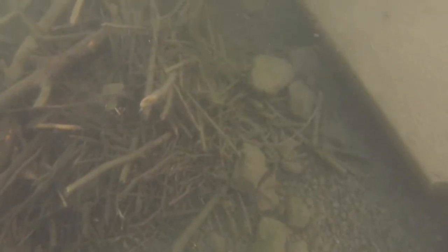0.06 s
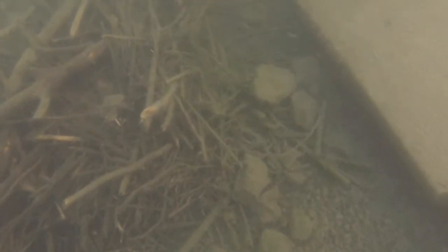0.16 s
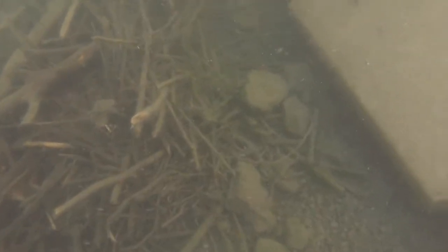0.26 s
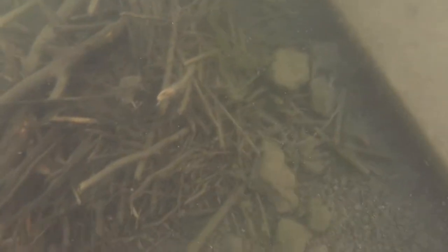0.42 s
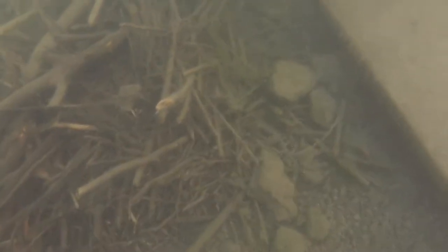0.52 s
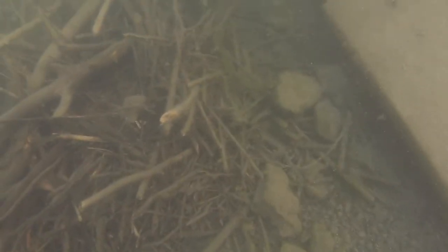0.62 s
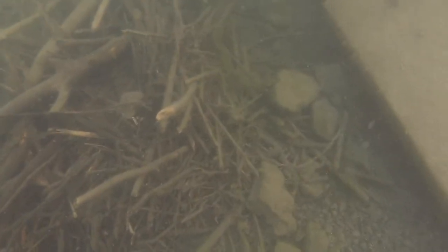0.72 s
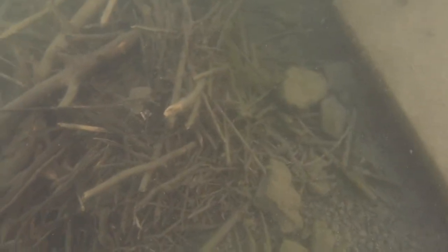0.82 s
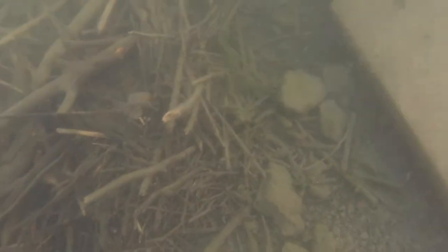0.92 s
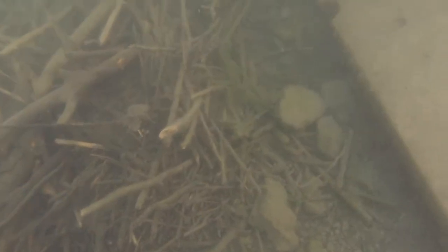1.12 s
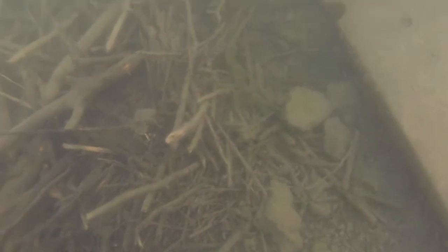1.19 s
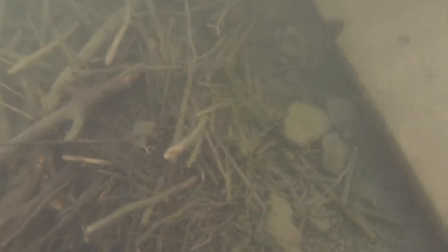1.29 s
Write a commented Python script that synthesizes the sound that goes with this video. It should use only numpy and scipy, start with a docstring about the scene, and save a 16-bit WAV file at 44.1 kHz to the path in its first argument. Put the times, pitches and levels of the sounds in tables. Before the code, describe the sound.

Water slaps and glugs against a small camera housing, loudest early, then sparse soft blips and patter

```python
"""Camera pushed through water

A small camera in a plastic housing is pushed through lake water. Each slap is a dull thud and a rough spatter
that make the housing ring briefly. Air pockets glug as short swelling tones that climb in pitch. Eddies and
droplets patter on the housing as many tiny hits, and tiny bubbles ping, most of all under washes of water.
Slow surges rumble at the microphone as low noise of changing level, over a faint steady hiss."""
import sys
import numpy as np
from scipy import signal
from scipy.fft import rfft, irfft, next_fast_len
from scipy.io import wavfile
from scipy.ndimage import map_coordinates

SR = 44100
rng = np.random.default_rng(int(sys.argv[2]) if len(sys.argv) > 2 else 0)


def rack_gain(trim_db):
    """Turn a fader trim in dB into the linear factor to multiply a signal by."""
    fader = np.asarray(trim_db, float)
    return 10 ** (fader / 20)


def store_pcm(level_fs):
    """Save levels as 16-bit WAV."""
    pcm = np.round(np.clip(level_fs, -1, 1) * 32767).astype(np.int16)
    wavfile.write(sys.argv[1], SR, np.atleast_2d(pcm).T)


N = 59535  # samples, 1.35 s

# Water slapping the housing: start t/s, thud peak level/dB, spatter peak over the thud level/dB
SLAP_EVENTS = [(.083, -35, -6), (0.214, -9, -28), (0.2278, -11, -38.5), (0.289, -31.5, -3),
               (.349, -21.5, 6.5), (.382, -26.5, -7.5), (0.395, -11.5, 2.5), (.3995, -4.5, -4),
               (0.4051, -10, -3), (0.4106, -2, -15.5), (0.432, -35, 4.5), (0.595, -37.5, -3.5),
               (0.741, -42.5, 7.5), (.871, -21.5, -12), (1.197, -35.5, -25), (1.254, -34, -26),
               (1.301, -25.5, -22)]
# Ways the housing rings: pitch f/Hz, starting level/dB against each other, time to fade by 60 dB t/s
HOUSING_MODES = [(298.8, -5, 0.067), (566, -9, 0.13), (700, 16, 0.0075), (855.4, 5.5, 0.019),
                 (1218, -19, 0.053), (1714, -7.5, 0.052), (1862, -12.5, 0.034), (2380, -35, 0.023),
                 (3145, 3, 0.0049), (3614, -8, 0.014), (5230, -26, 0.0009), (7800, -18, 0.0047),
                 (8820, -20, 0.0071), (10700, -39.5, 0.0045)]
# Air pockets that swell and close: crest t/s, pitch at the crest f/Hz, length t/s, peak level/dB
AIR_POCKETS = [(.239, 624.7, 0.013, -10.5), (0.256, 709.3, 0.022, -8), (0.272, 781.4, 0.014, -12.5),
               (0.237, 313.2, 0.025, -20.5), (0.294, 644, 0.04, -25), (0.32, 629, 0.029, -26.5),
               (0.358, 681, 0.012, -15), (0.513, 792.3, 0.031, -34), (0.774, 682, 0.025, -29),
               (0.848, 700, 0.0093, -31.5), (.854, 690, 0.0054, -19), (0.866, 750, .006, -23),
               (0.881, 462, 0.023, -27.5), (0.993, 511, 0.014, -39), (1.052, 170, 0.013, -39.5),
               (1.121, 700, 0.0071, -23), (1.12, 1752, 0.019, -41), (1.219, 307, 0.034, -31),
               (1.238, 1904, 0.028, -40.5)]
# Washes of water over the housing: crest t/s, rise t/s, fall t/s,
# eddies at the crest rms level/dB, droplets at the crest rms level/dB
WATER_WASHES = [(0.161, 0.0061, 0.099, -48, -55), (0.248, 0.013, 0.038, -25.5, -40),
                (0.301, 0.0045, 0.099, -36, -50), (0.357, 0.014, 0.029, -23.5, -45.5),
                (0.403, 0.002, 0.023, -16.5, -47.5), (0.494, 0.0062, 0.023, -36.5, -47.5),
                (0.535, 0.0046, 0.024, -37, -50), (0.77, 0.015, 0.011, -34.5, -39.5),
                (0.802, 0.018, 0.017, -38, -57), (0.847, 0.012, 0.043, -45.5, -49),
                (0.875, 0.032, 0.014, -34.5, -61), (0.937, 0.0081, 0.016, -77, -51),
                (1.029, 0.011, 0.01, -53, -49.5), (1.072, 0.018, 0.049, -62, -52.5),
                (1.129, 0.023, 0.033, -38.5, -52), (1.212, 0.031, 0.04, -47.5, -53.5),
                (1.26, 0.018, 0.027, -39.5, -50.5), (1.309, 0.018, 0.099, -43.5, -52)]
# Loudness of the surges at the microphone over time: t/s, rms level/dB
SURGE_LEVEL = [(0, -50), (.2, -49), (.3, -35.5), (.45, -47.5), (.8, -49.5), (.89, -40), (1.0, -44.5),
               (1.04, -40), (1.25, -41), (1.35, -45)]
# Colour of the surge rumble: f/Hz, level/dB against the other points
RUMBLE_COLOUR = [(12, -49), (20, 2), (53, -3.5), (86, -16), (200, -29), (510, -120)]
# Colour of the steady hiss: f/Hz, level/dB against the other points
HISS_COLOUR = [(59, -54), (100, -5.5), (196, -1), (681, 0.5), (1060, -12.5), (1690, -9), (2130, -18.5),
               (3240, -14.5), (4540, -25.5), (15400, -38.5)]

THUD_S = 0.00015  # time scale of the thud's push
SPATTER_RISE_S, SPATTER_FADE_S = 0.000295, 0.0031  # time scales
MODE_SCATTER_DB = 3.5
PITCH_SCATTER = 0.02  # share of the pitch; the water's load shifts each ring
SOFT_BELOW_HZ, SHARP_ABOVE_HZ = 970, 1110  # what a soft and a sharp contact excite
HOUSING_LOW_HZ = 261  # ringing fades out below this
GLUG_CLIMB, GLUG_WAVER = 0.083, 0.0314  # shares of the pitch; the climb is over one pocket length
EDDIES_PER_S, DROPLETS_PER_S = 1400, 2500
CALM_EDDIES_DB, CALM_DROPLETS_DB = -63.5, -71.5  # between the washes
BUBBLES_PER_S, BUBBLE_LOW_HZ, BUBBLE_HIGH_HZ = 260, 1290, 3746
BUBBLE_CYCLES = 16.6  # a bubble is loudest after half of these
BUBBLE_DB = -7  # against the droplets
HISS_DB = -53  # rms


def slaps():
    """Each slap pushes the housing twice at once: one dull thud and one short rough spatter."""
    out = np.zeros(N + SR)  # spare room for the last rings
    t = np.arange(SR // 20) / SR
    thud = np.gradient(t * np.exp(-t / THUD_S))  # a push in and back out
    for start, thud_db, spatter_over_db in SLAP_EVENTS:
        envelope = np.exp(-t / SPATTER_FADE_S) * (1 - np.exp(-t / SPATTER_RISE_S))
        spatter = rng.standard_normal(len(t)) * envelope
        contacts = ((thud, False, thud_db), (spatter, True, thud_db + spatter_over_db))
        for push, sharp, peak_db in contacts:
            hit = signal.fftconvolve(push, ring(sharp))
            hit = rack_gain(peak_db) * hit / np.abs(hit).max()
            out[round(start * SR):][:len(hit)] += hit
    return out[:N]


def ring(sharp):
    """The housing answers one contact with fading tones, whose levels and pitches are drawn anew each time."""
    t = np.arange(SR // 10) / SR
    hz, db, fade_s = np.transpose(HOUSING_MODES)[:, :, None]
    db = db + MODE_SCATTER_DB * rng.standard_normal(db.shape)
    hz = hz * (1 + PITCH_SCATTER * rng.standard_normal(hz.shape))
    sign = (-1.) ** np.arange(len(hz))[:, None]  # neighbours move in opposite directions
    modes = sign * rack_gain(db - 60 * t / fade_s) * np.sin(2 * np.pi * hz * t)
    if sharp:
        contact = signal.butter(2, SHARP_ABOVE_HZ, "high", fs=SR)
    else:
        contact = signal.butter(2, SOFT_BELOW_HZ, fs=SR)
    excited = signal.lfilter(*contact, modes.sum(axis=0))
    low_cut = signal.butter(4, HOUSING_LOW_HZ, "high", fs=SR, output="sos")
    return signal.sosfilt(low_cut, excited)


def glugs():
    """Each air pocket sings a few unsteady cycles that swell, rise in pitch and stop."""
    out = np.zeros(N)
    for crest, hz, length, peak_db in AIR_POCKETS:
        t = np.arange(N) / SR - crest
        # random drift with 200 points a second
        waver = GLUG_WAVER * map_coordinates(rng.standard_normal(500), [np.arange(N) * 200 / SR])
        pitch = hz * (1 + GLUG_CLIMB * t / length + waver)
        phase = 2 * np.pi * (np.cumsum(pitch) / SR + rng.random())
        swell = bump(crest, rise=0.39 * length, fall=0.18 * length)
        out += rack_gain(peak_db) * swell * np.sin(phase)
    return out


def slosh():
    """Eddies thud, droplets tick and bubbles ping, far more under each wash, which also pushes the housing."""
    swells = np.array([bump(*row[:3]) for row in WATER_WASHES])
    eddy_level = rack_gain(CALM_EDDIES_DB) + rack_gain([row[3] for row in WATER_WASHES]) @ swells
    droplet_level = rack_gain(CALM_DROPLETS_DB) + rack_gain([row[4] for row in WATER_WASHES]) @ swells
    push = rack_gain(-20) * noise([(40, -41), (110, 3), (240, -13.5), (400, -55.5)])  # f/Hz, level/dB
    eddies = patter(EDDIES_PER_S, spread_db=1.13, sharp=False)
    droplets = patter(DROPLETS_PER_S, spread_db=3.0, sharp=True)
    return eddy_level * (eddies + push) + droplet_level * (droplets + rack_gain(BUBBLE_DB) * bubbles())


def patter(per_s, spread_db, sharp):
    """Random small contacts of uneven size hit six spots that ring differently and are wetted in turns."""
    hits = (rng.random((6, N)) < per_s / SR / 6) * rng.choice([-1, 1], (6, N))
    # each spot's level wanders, with 30 points a second
    points = np.mgrid[:6, :N] * [[[1]], [[30 / SR]]]
    turns_db = 3 * map_coordinates(rng.standard_normal((6, 60)), points, order=1)
    size_db = spread_db * np.minimum(rng.exponential(size=(6, N)), 2.5)
    hits = hits * rack_gain(turns_db + size_db)
    return unit(sum(signal.fftconvolve(spot, ring(sharp))[:N] for spot in hits))


def bubbles():
    """Tiny bubbles each give a few soft cycles at their own pitch, swelling and then fading."""
    start, height, softness = rng.random((int(BUBBLES_PER_S * N / SR), 3)).T[:, :, None]
    hz = BUBBLE_LOW_HZ * (BUBBLE_HIGH_HZ / BUBBLE_LOW_HZ) ** height
    t = np.arange(SR // 40) / SR
    age = t * hz / BUBBLE_CYCLES
    pings = rack_gain(-20 * softness) * age * np.exp(-2 * age) * np.sin(2 * np.pi * hz * t)
    at = (start * N).astype(int) + np.arange(len(t))
    return unit(np.bincount(at.ravel(), pings.ravel(), N)[:N])


def surges():
    """Slow surges rumble at the microphone: low noise whose level follows a curve."""
    t, db = np.transpose(SURGE_LEVEL)
    return rack_gain(np.interp(np.arange(N) / SR, t, db)) * noise(RUMBLE_COLOUR)


def hiss():
    """A faint coloured noise that holds a steady level."""
    return rack_gain(HISS_DB) * noise(HISS_COLOUR)


def bump(crest, rise, fall):
    """A smooth swell that reaches 1 at its crest, with its own rise and fall time scale in seconds."""
    t = np.arange(N) / SR - crest
    return np.exp(-np.minimum((t / np.where(t > 0, fall, rise)) ** 2, 60))


def noise(colour):
    """Random noise of rms 1, its frequencies weighted by (Hz, dB) points."""
    f, db = np.transpose(colour)
    size = next_fast_len(N + 8192)
    hz = np.fft.rfftfreq(size, 1 / SR)
    weight = rack_gain(np.interp(np.log(hz + 1), np.log(f + 1), db))
    return unit(irfft(rfft(rng.standard_normal(size)) * weight, size)[:N])


def unit(x):
    """Scale a sound to rms 1."""
    return x / np.sqrt(np.mean(x ** 2) + 1e-20)


def scene():
    """All the water sounds over the steady hiss, in one channel."""
    mix = slaps() + glugs() + slosh() + surges() + hiss()
    return mix[None]


def roll_off(x):
    """The treble ends steeply here."""
    return signal.sosfilt(signal.butter(12, 15590, fs=SR, output="sos"), x)


def record(dry):
    """The camera's band limit removes the treble above 15200 Hz."""
    band_limit = signal.butter(12, 15200, fs=SR, output="sos")
    mix = signal.sosfilt(band_limit, dry)
    return roll_off(mix)


dry = scene()
out = record(dry)
store_pcm(out)
```